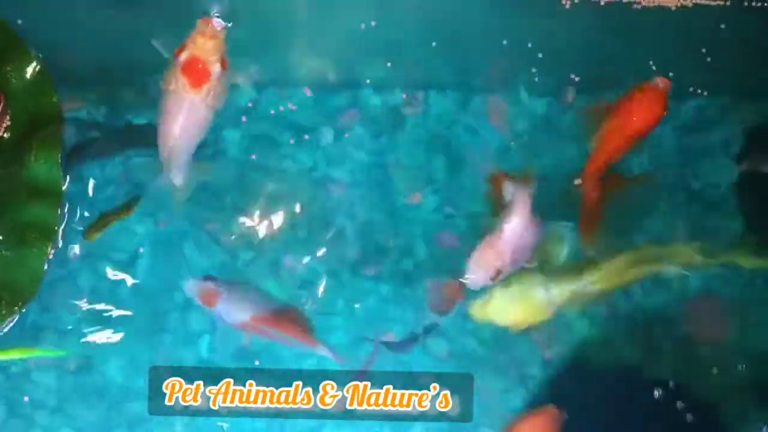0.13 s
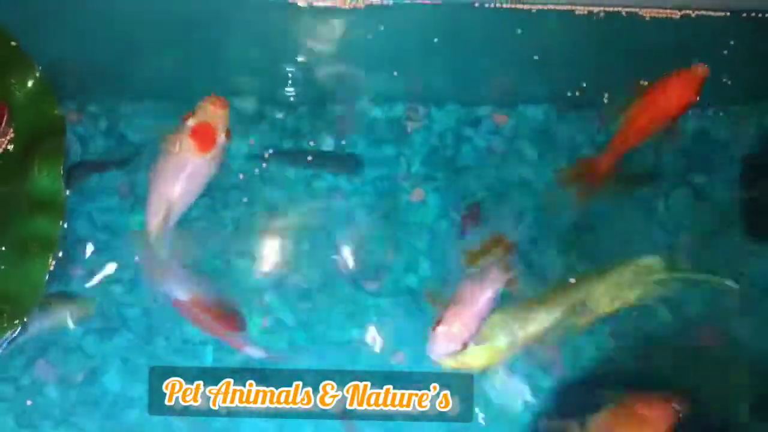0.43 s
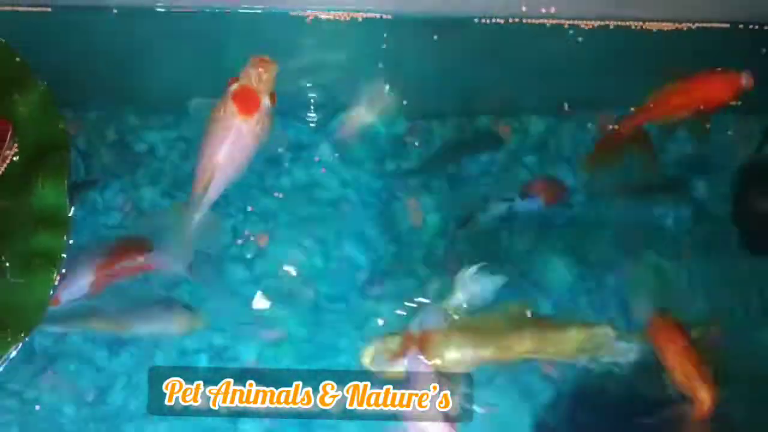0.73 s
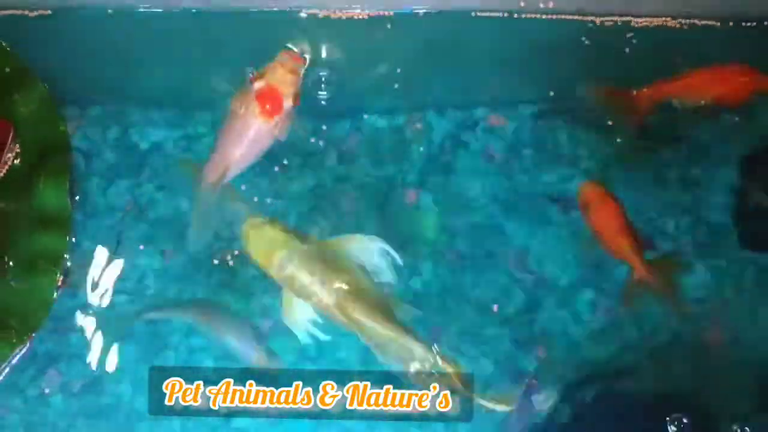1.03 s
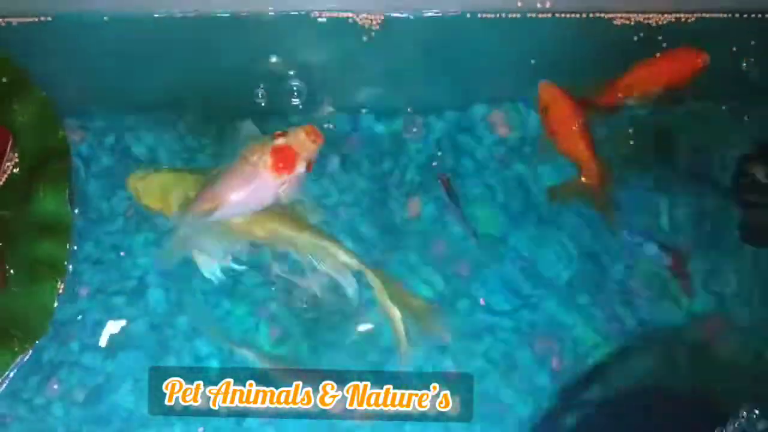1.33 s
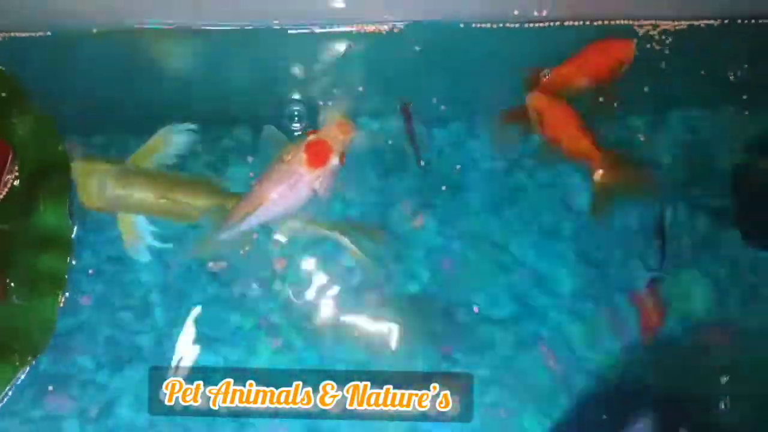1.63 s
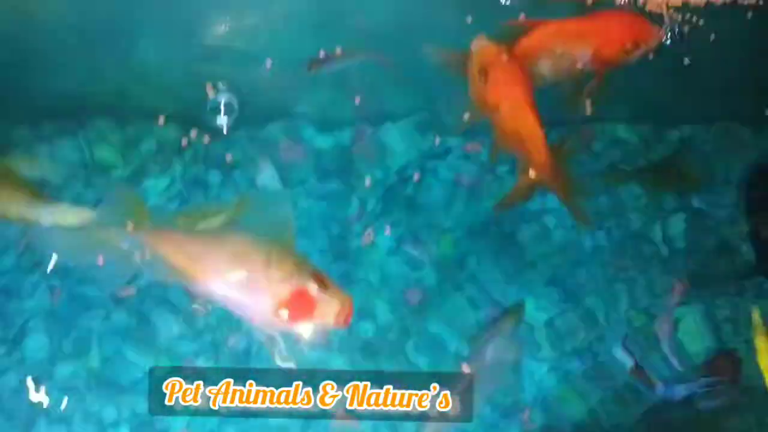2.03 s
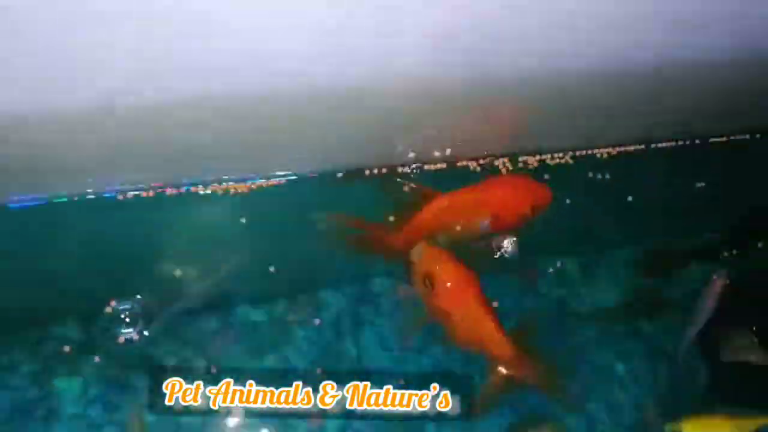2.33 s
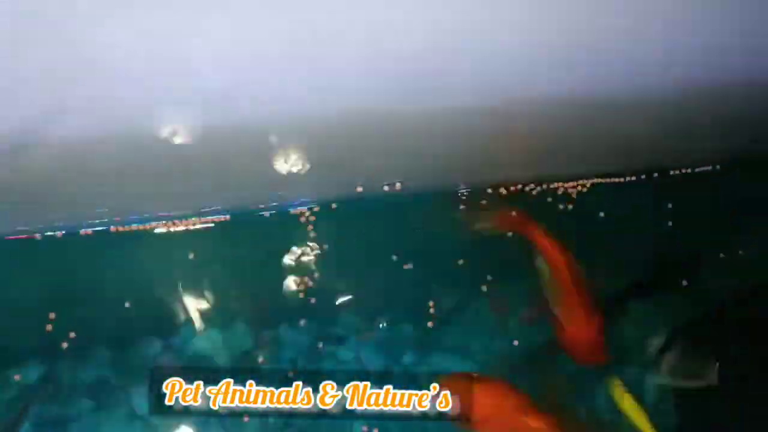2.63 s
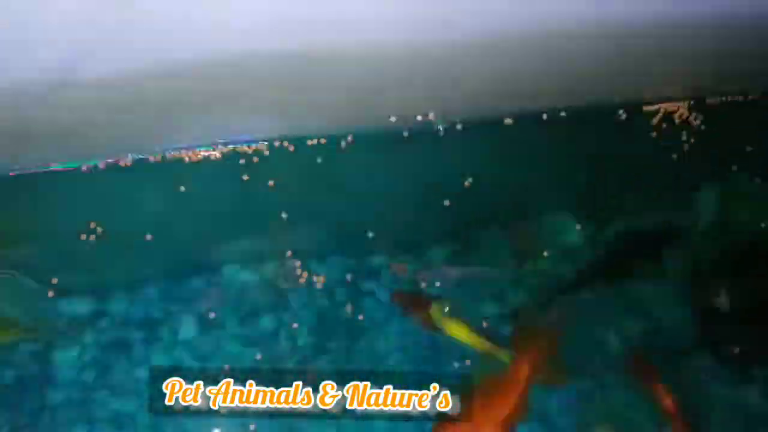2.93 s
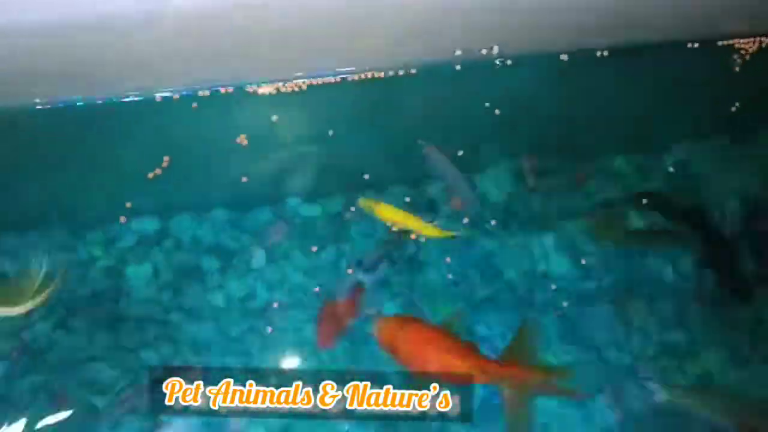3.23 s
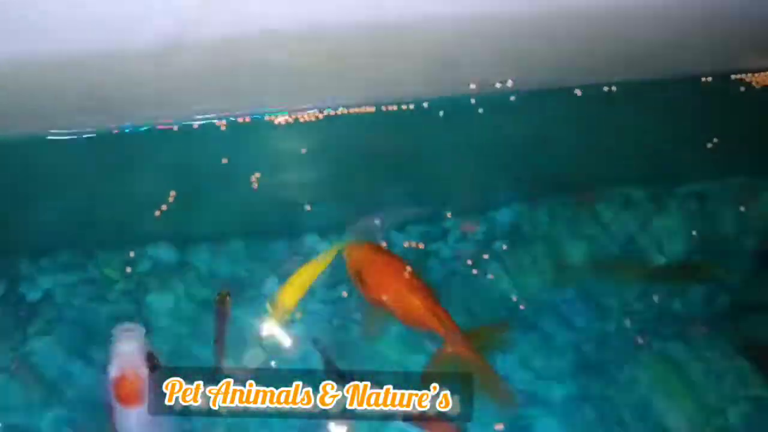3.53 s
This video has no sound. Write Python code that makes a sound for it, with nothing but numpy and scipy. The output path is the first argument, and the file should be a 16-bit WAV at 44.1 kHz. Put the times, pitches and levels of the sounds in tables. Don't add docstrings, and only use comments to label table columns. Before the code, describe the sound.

Aquarium water hisses and trickles over a low pump hum, with drops, plops and small splashes

```python
import sys
import numpy as np
from scipy import signal
from scipy.fft import rfft, irfft
from scipy.io import wavfile
from scipy.ndimage import uniform_filter1d, minimum_filter1d

SR = 44100
rng = np.random.default_rng(int(sys.argv[2]) if len(sys.argv) > 2 else 0)


def invert_db(x):
    u = np.asarray(x, float) / 20
    return 10 ** u


def store_pcm(level_fs):
    pcm = np.round(np.clip(level_fs, -1, 1) * 32767).astype(np.int16)
    wavfile.write(sys.argv[1], SR, np.atleast_2d(pcm).T)


N = 162729
LEFT_LAG_S = 0.0004967


def walk(rate):
    k = int(SR / rate)
    levels = np.repeat(rng.standard_normal(N // k + 1), k)
    return 0.74 * uniform_filter1d(uniform_filter1d(levels, k), k)[:N]


def bell(x, hz, octaves, lag_s=0.):
    f = np.maximum(np.fft.rfftfreq(x.shape[-1], 1 / SR), 1)
    band = np.exp(-.5 * (np.log2(f / hz) / octaves) ** 2 - 2j * np.pi * f * lag_s)
    y = irfft(rfft(x) * band, x.shape[-1])
    return y / np.sqrt(np.mean(y ** 2, axis=-1, keepdims=True))


def pair(shape, alike):
    shared = np.clip(alike, 0, 1)
    noise = rng.standard_normal((3,) + shape)
    return np.sqrt(shared) * noise[0] + np.sqrt(1 - shared) * noise[1:]


def sides(pan_db):
    return invert_db(np.array([pan_db, -np.asarray(pan_db)]) / 2)


def add(out, start_s, grains):
    for k, i in enumerate((np.asarray(start_s) * SR).astype(int)):
        n = min(grains.shape[2], N - i)
        out[:, i:i + n] += grains[:, k, :n]


def fizz(x):
    patch_db = 4
    z = signal.stft(x, nperseg=1024)[2]
    patch = uniform_filter1d(rng.standard_normal(z.shape), size=3, axis=1) * np.sqrt(3)
    gain = invert_db(patch_db * patch - patch_db ** 2 / 8.7)
    return signal.istft(z * gain, nperseg=1024)[1][:, :N]


def bursts(out, start_s, db, hz, pan_db, octaves, decay_s):
    attack_s, grit_db, skirt_db, skirt_wider = .002, 7, 0.5, 4.63
    u = np.arange(2048) / SR
    shape = (len(start_s), len(u))
    noise = pair(shape, 0.054) * invert_db(grit_db * rng.standard_normal(shape))
    puff = []
    for x, lag in zip(noise, (LEFT_LAG_S, 0.)):
        core = bell(x, hz[:, None], octaves, lag)
        skirt = bell(x, hz[:, None], octaves * skirt_wider, lag)
        rise = 1 - np.exp(-np.maximum(u - lag, 0) / attack_s)
        fall = np.exp(-(u / np.reshape(decay_s, (-1, 1))) ** 2)
        puff.append((core + invert_db(skirt_db) * skirt) * rise * fall)
    puff = np.array(puff)
    puff = puff / np.abs(puff).max(axis=2, keepdims=True)
    add(out, np.maximum(start_s - .002, 0), puff * (invert_db(db) * sides(pan_db))[:, :, None])


def bubbles(out, start_s, db, hz, pan_db, length_s, glide):
    lag_s = np.array([LEFT_LAG_S / 4, 0])[:, None, None]
    x = np.maximum(np.arange(3072) / SR - lag_s, 0) / length_s[:, None]
    env = np.sin(np.pi / 2 * np.minimum(x / 0.39, 1)) ** 2 * np.exp(-(x / 1.67) ** 1.6)
    tone = np.sin(2 * np.pi * (hz * length_s)[:, None] * (x + glide * x ** 2 / 2))
    add(out, start_s, env * tone * (invert_db(db) * sides(pan_db))[:, :, None])


def rumble(turn):
    # pitch_hz [Hz], level_db [dB per Hz]
    rumble_colour = [(25, -28), (70, -18), (112, -13), (175, 4.5), (320, 0), (480, -8.5), (800, -10),
                     (1300, -25.5)]
    level_db, turn_db, pan_db, wide_hz = -39, 3.5, -2, 600
    f = np.maximum(np.fft.rfftfreq(N, 1 / SR), 1)
    hz, db = np.array(rumble_colour).T
    colour = invert_db(np.interp(np.log(f), np.log(hz), db, right=-70))
    mid, side = rfft(rng.standard_normal((2, N))) * colour
    width = np.minimum((30 / f) ** 2 + (f / wide_hz) ** 2, .35)
    low = irfft(mid + width * side * np.array([[1], [-1]]), N)
    return low / low.std() * invert_db(level_db + turn_db * turn) * sides(pan_db)[:, None]


def hiss(turn):
    # [left minus right, dB]
    hiss_bands = [(650, 1.5, 8, 1, -1), (1296, -1, 6.5, -1, -2), (2450, -1, 0.5, 3, -3),
                  (4600, 1.5, 1, 1, -1.5), (6860, -3, 3, 0, -2), (10800, -11, 9, -9, -3.5),
                  (13000, -5, 8.5, -2, 8), (17300, -17, 14, -16, -9)]
    top_db, alike, flicker_db, shared_db = -84.5, 0.17, 2.5, 5
    out, rows, near = 0, np.array(hiss_bands).T, walk(31)
    for hz in 700 * 2 ** np.arange(0, 4.7, 1 / 3):
        db, rise, pan_a, pan_b = (np.interp(np.log(hz), np.log(rows[0]), r) for r in rows[1:])
        near = 0.38 * near + 0.39 * walk(20)
        noise = pair((N,), alike * (1000 / hz) ** 3.2)
        band = np.array([bell(noise[0], hz, 1 / 6, LEFT_LAG_S), bell(noise[1], hz, 1 / 6)])
        level = top_db + db + 10 * np.log10(hz / 4) + rise * turn
        level = level + shared_db * near + flicker_db * walk(35.2)
        out = out + band * invert_db(level) * sides(pan_a + (pan_b - pan_a) * turn)
    return fizz(out)


def trickle(out, t):
    count, level_db, spread_db, low_hz, octaves = 260, -50.5, 1.5, 1125, 2.3
    c = rng.random((count, 5)).T
    hz = low_hz * 2 ** (octaves * c[2])
    db = level_db - spread_db * np.log(0.3 + c[1])
    bubbles(out, c[0] * t[-1], db, hz, 8 * (c[3] - .6), (6 + 14 * c[4]) / hz, 0.193)


def mist(out, t, turn):
    count, level_db, spread_db, turn_db = 200, -36.5, 2.5, 4.5
    c = rng.random((count, 5)).T
    start_s = c[0] * t[-1]
    late = np.interp(start_s, t, turn)
    db = level_db + turn_db * late - spread_db * np.log(0.097 + c[1])
    pan_db = -5 + 5 * late + 6 * (c[3] - .5)
    bursts(out, start_s, db, 3500 * 2 ** (2.61 * c[2]), pan_db, .12, .006 + .012 * c[4])


def gurgles(out):
    gurgle_events = [(0.1353, -30, 1470), (0.347, -27, 1990), (0.9827, -28, 1790), (1.135, -29, 1430),
                     (1.14, -34, 1900), (1.194, -32, 1430), (1.194, -38, 1810), (1.45, -32.5, 1930),
                     (3.43, -32, 1370), (3.51, -32.5, 1770), (2.4645, -23, 1360), (2.735, -25.5, 2270),
                     (3.3044, -29.5, 1630)]
    start_s, db, hz = np.array(gurgle_events).T
    bursts(out, start_s, db - 6.5, hz, 0 * start_s - 2.5, 0.041, 0.014)


def gulps(out):
    gulp_events = [(.128, -32.5, 600), (.55, -36.5, 616), (.65, -36, 600), (1.38, -36, 600),
                   (1.14, -30.5, 610), (1.975, -35.5, 614), (2.095, -25.5, 600), (2.26, -35, 600),
                   (2.576, -29.5, 558), (2.73, -34.5, 720), (3.15, -34, 616), (3.6, -24, 622)]
    start_s, db, hz = np.array(gulp_events).T
    bubbles(out, start_s, db - 2.5, hz, 0 * start_s - 5, 0 * start_s + 0.014, 0.0052)


def plops(out):
    plop_events = [
        (1.155, -27, 726, -4, 0.0053),
        (1.305, -36, 501, 0, 0.023),
        (1.429, -39, 956, -1, 0.0067),
        (1.447, -18.5, 770, -4, 0.0078),
        (3.591, -11.5, 391, 5, 0.0074),
    ]
    bubbles(out, *np.array(plop_events).T, 0.096)


def drops(out):
    # [left minus right, dB]
    drop_events = [(0.0672, -20.5, 4800, -10), (0.2024, -25, 4200, -2), (1.1694, -23, 3750, -2.5),
                   (1.3592, -7, 5820, -1), (0.17, -24.5, 2900, 3), (0.2668, -22.5, 4300, 0),
                   (0.409, -23.5, 5500, 0), (0.6913, -32, 3600, 0), (0.7257, -28.5, 3460, -5),
                   (0.8744, -26, 4900, -4), (1.2682, -29, 3410, -2), (1.36, -21, 3380, -1),
                   (1.4009, -29, 3900, -2), (1.4576, -26, 3450, -2), (1.63, -23.5, 4600, -4),
                   (1.7027, -23.5, 4800, -2), (1.7246, -27, 3500, 1), (2.607, -14, 4200, -3),
                   (2.8328, -12, 4250, -4), (3.496, -9.5, 5600, -2)]
    start_s, db, hz, pan_db = np.array(drop_events).T
    bursts(out, start_s, db - 8, hz, pan_db, 0.061, 0.011)


def spray(out, t, turn):
    # [centre, Hz]
    spray_events = [(0.049, -29, 11500), (0.15, -25, 9700), (0.263, -18.5, 8850), (0.3836, -29, 10800),
                    (0.5403, -17.5, 10300), (0.586, -26, 10800), (0.7488, -23.5, 6960), (0.7815, -21, 10100),
                    (0.8375, -34, 15400), (1.0855, -27.5, 6760), (1.1074, -21, 8270), (1.151, -22.5, 6360),
                    (1.2116, -29, 13900), (1.452, -24, 13300), (1.4782, -26, 9700), (1.316, -31, 15600),
                    (1.556, -30.5, 12200), (1.6615, -31, 7000), (1.6641, -25, 14400), (1.683, -31, 11500),
                    (1.7447, -29.5, 7500), (1.7927, -29.5, 6940), (1.8218, -21, 14000), (1.8497, -24, 8350),
                    (1.8908, -26, 6560), (1.9275, -21, 14200), (2.19, -29, 15300), (2.19, -27, 7100),
                  (2.285, -26.5, 7300), (2.3481, -25.5, 10500), (2.4572, -20.5, 8800), (2.51, -17.5, 9440),
                  (2.5386, -19, 15300), (2.585, -20, 15400), (2.6524, -21, 15000), (2.6968, -20, 15400),
                  (2.7297, -15.5, 14000), (2.77, -18, 11800), (2.782, -20, 11500), (2.8624, -20, 13800),
                  (2.899, -13.5, 13000), (2.9277, -25, 15100), (2.9446, -17, 10800), (3.011, -16, 15600),
                  (3.051, -16.5, 15700), (3.0956, -14, 10400), (3.118, -16, 13900), (3.17, -18, 14400),
                  (3.2163, -23.5, 6400), (3.278, -26, 11600), (3.3463, -23, 13300), (3.3667, -19, 12300),
                  (3.421, -26, 8700), (3.494, -16.5, 7350), (3.655, -21, 13500)]
    start_s, db, hz = np.array(spray_events).T
    pan_db = -5.5 + 4 * np.interp(start_s, t, turn)
    decay_s = 0.015 * 2 ** rng.uniform(-.6, .1, len(start_s))
    bursts(out, start_s, db, hz, pan_db, .13, decay_s)


def fish(out, t):
    splash_layers = [(1.855, 0.35, -43.5, 4070, 2), (2.055, 0.039, -39.5, 13800, 0.49),
                     (2.065, 0.036, -36.5, 2250, 0.82), (2.066, .034, -37.5, 6600, .5),
                     (2.104, .01, -41, 5300, .15), (2.138, 0.0065, -36, 1800, 1.6),
                     (2.569, 0.052, -38.5, 650, 0.72), (3.525, 0.1, -32.5, 14300, 0.15),
                     (3.532, 0.1, -29, 5300, 0.6), (3.535, .09, -37, 9600, 0.14),
                     (3.56, 0.02, -28.5, 6450, .6), (3.568, 0.072, -40, 1090, 0.5),
                     (3.536, 0.089, -42, 2230, 0.44)]
    for start_s, length_s, db, hz, octaves in splash_layers:
        x = (t - start_s) / length_s
        rise = np.clip(x / 0.091, 0, 1)
        swell = 1.14 + .5 * np.sin(np.pi * np.clip(x, 0, 1))
        fall = np.exp(-np.maximum(x - .6, 0) ** 2 / 0.13)
        env = rise * swell * fall * invert_db(1.6 * walk(600))
        pan_db = 11 if hz > 1e4 else -2.5
        out += env * fizz(bell(pair((N,), 0.29), hz, octaves)) * invert_db(db) * sides(pan_db)[:, None]


def pump(turn):
    stroke_tones = [(2.03, -52, -50.5, -1.5, 0.5), (3.1, -43.5, -42.5, -2.5, 0.06),
                    (3.9, -48.5, -53, 5, 0.2), (5.07, -40, -36.5, -3, 0.1), (5.92, -42, -43, 4.5, 0.98),
                    (6.95, -49, -41.5, 9, 2.02), (7.73, -48.5, -52, 4, -0.65), (9, -56.5, -56.5, 16, 0.3),
                    (10.15, -57.5, -56, 10, -0.3), (12, -57.5, -49, -4.5, 2), (13.13, -69, -86, -3, 1),
                    (14.5, -56.5, -74, -15, -6), (14.89, -52.5, -48, 5, 0.02), (15.91, -49, -43, -2, 0.4),
                    (17.05, -61.5, -53.5, 3, 1.3), (17.91, -59.5, -54.5, 6.5, -0.1),
                    (18.74, -57.5, -78, 1, 1.5), (19.94, -52.5, -65, -5, -1), (21.14, -59.5, -78, 7, -1)]
    stroke_hz, drift, waver_db, waver_rate, smear_rad = 49.36, 0.001, 2.5, 9, 0.1215
    phase = 2 * np.pi * np.cumsum(stroke_hz * (1 + drift * walk(1.447))) / SR
    out = np.zeros((2, N))
    for k, before_db, after_db, pan_db, lead in stroke_tones:
        waver = waver_db * np.clip(k / 15, .3, 1) * walk(waver_rate)
        gain = np.sqrt(2) * invert_db(before_db + (after_db - before_db) * turn + waver)
        p = round(k) * phase + smear_rad * k ** 2
        out += gain * sides(pan_db)[:, None] * np.array([np.sin(p + lead), np.sin(p)])
    return out


def scene():
    turn_s, turn_length_s = 1.97, 0.19
    t = np.arange(N) / SR
    turn = .5 + .5 * np.tanh((t - turn_s) / turn_length_s)
    water = np.zeros((2, N))
    trickle(water, t)
    mist(water, t, turn)
    gurgles(water)
    gulps(water)
    plops(water)
    drops(water)
    spray(water, t, turn)
    fish(water, t)
    return rumble(turn) + hiss(turn) + water + pump(turn)


def thin(x):
    hole_share, hole_db, low_hz = .0022, -35, 1100
    f, _, z = signal.stft(x, SR, nperseg=1024)
    seeds = minimum_filter1d(rng.random(z.shape[1:]), size=4, axis=0)
    seeds = minimum_filter1d(seeds, size=4, axis=1)
    holes = (seeds < hole_share) & (f[:, None] > low_hz)
    return signal.istft(z * invert_db(hole_db * holes), nperseg=1024)[1][:, :N]


def low_pass(x):
    return signal.sosfilt(signal.butter(12, 16400, fs=SR, output="sos"), x)


def record(dry):
    top_cut = signal.ellip(10, .2, 45, 15900, fs=SR, output="sos")
    mix = signal.sosfilt(top_cut, thin(dry))
    return low_pass(mix)


dry = scene()
out = record(dry)
store_pcm(out)
```